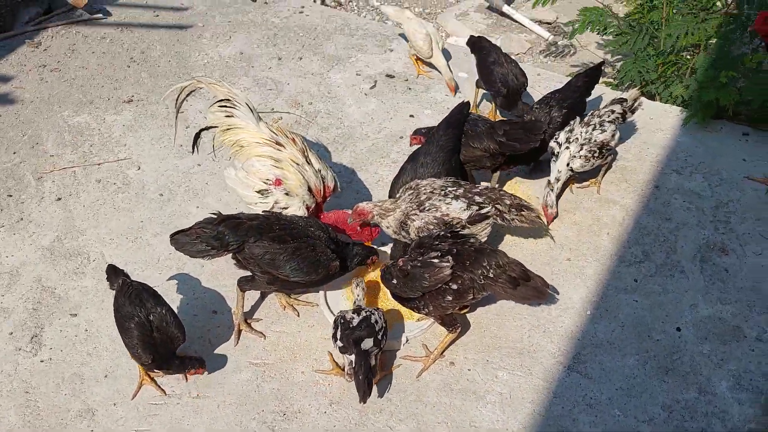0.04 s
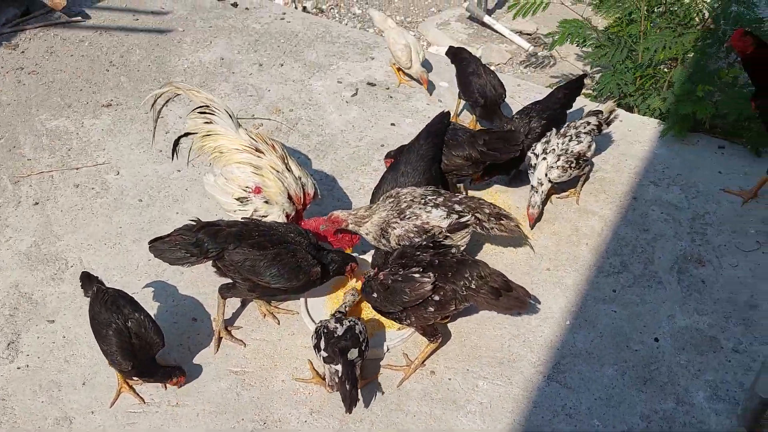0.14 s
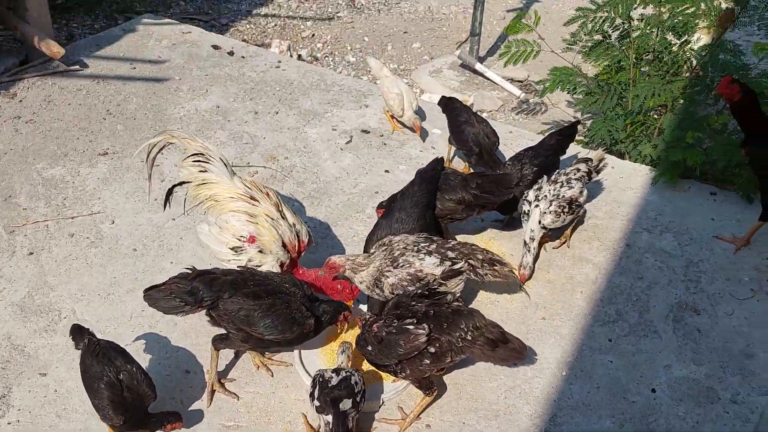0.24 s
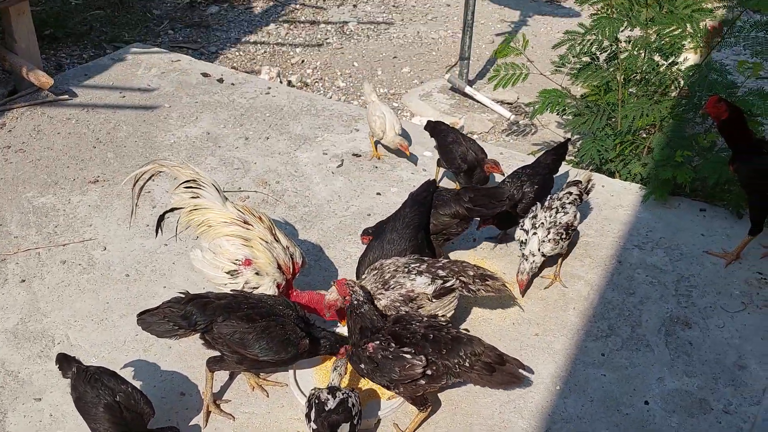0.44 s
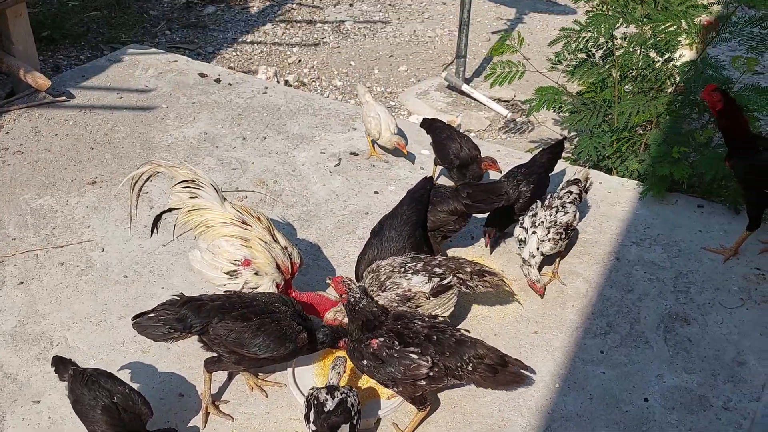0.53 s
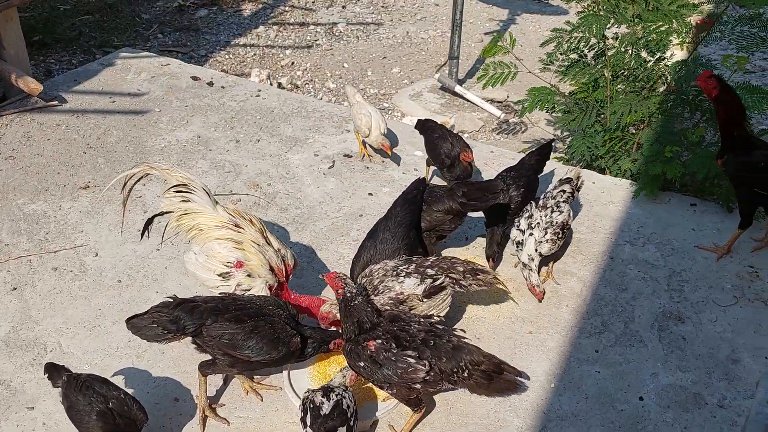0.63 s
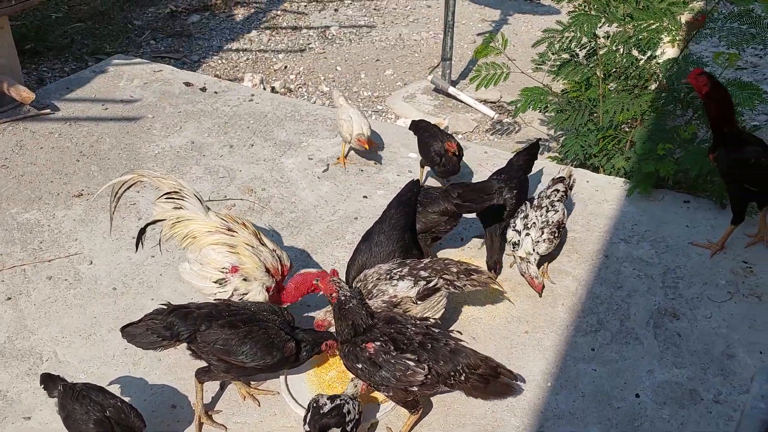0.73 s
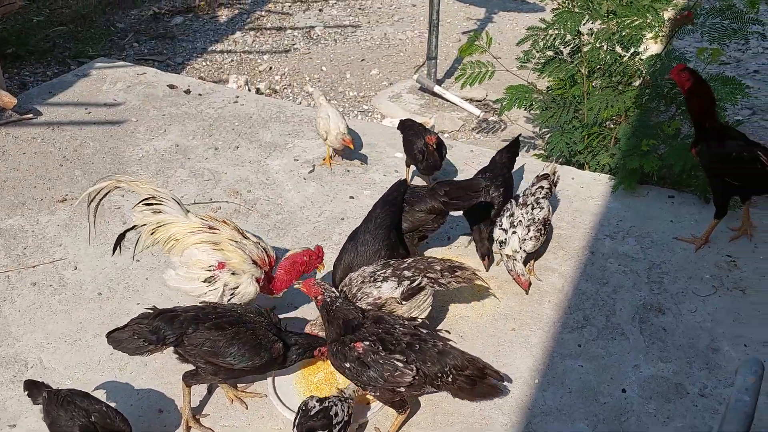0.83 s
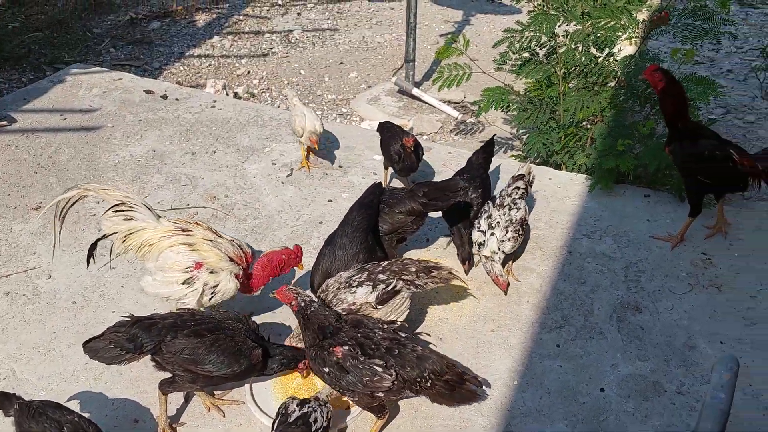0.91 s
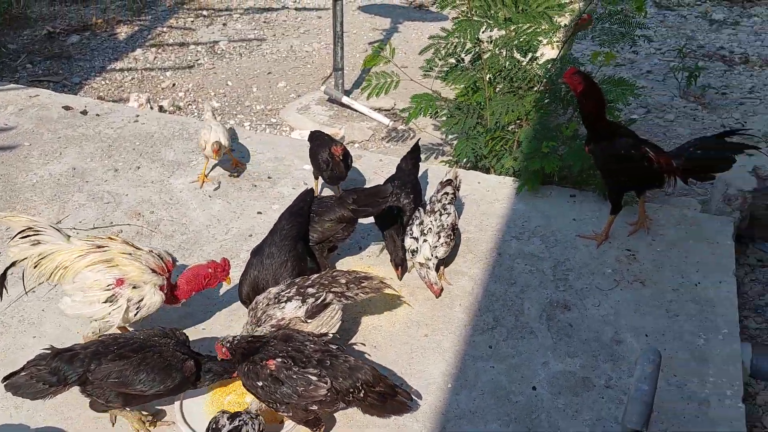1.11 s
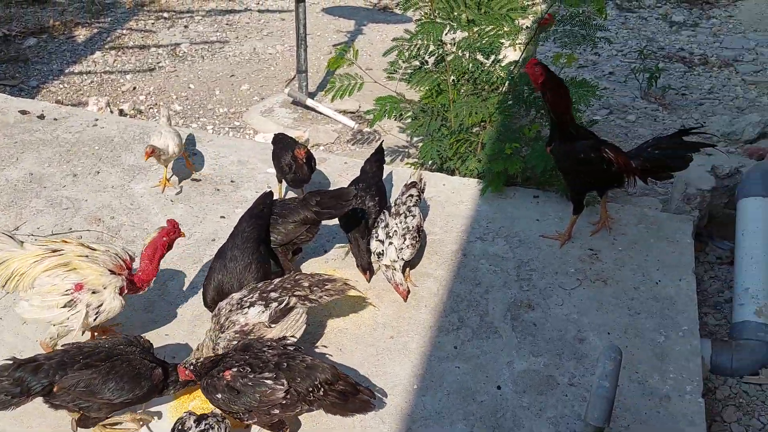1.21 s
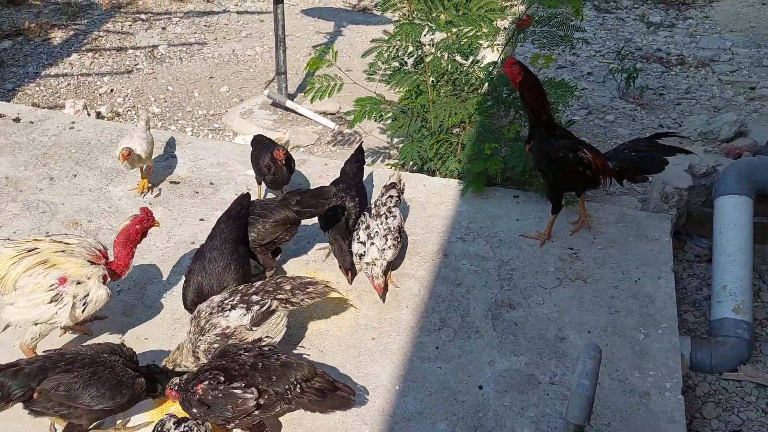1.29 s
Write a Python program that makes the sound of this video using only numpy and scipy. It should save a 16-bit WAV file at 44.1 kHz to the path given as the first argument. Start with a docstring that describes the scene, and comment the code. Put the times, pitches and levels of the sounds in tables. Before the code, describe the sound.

A hen's loud call over pecking at a grain plate on concrete. Knocks at 0 and 0.04 s, a soft cluck from another hen near 0.1, a hoarse syllable 0.2-0.43, a loud clear one 0.53-0.65, a fluttering broken one 0.7-0.86, sliding to a quieter held lower note until 1.07, then a low cluck to 1.17. Irregular dry knocks continue to 1.33; faint hiss, short wall echo.

```python
"""A beak knocks a plate on concrete in a walled yard, another hen clucks softly, then one hen calls:
a hoarse syllable, a clear one, a broken one sliding to a held lower note, a last cluck. Knocks are
filtered clicks over decaying plate modes, clear notes are stacks of sines, and the hoarse voice is
irregular pulses and breath through throat resonances. A grain ticks as a short ring; hiss and low
wind are shaped noise. The walls answer as decaying noise convolved with voice and knocks."""
import sys
import numpy as np
from scipy import signal
from scipy.fft import rfft, irfft, next_fast_len
from scipy.io import wavfile
from scipy.ndimage import uniform_filter1d, map_coordinates

SR = 44100
rng = np.random.default_rng(int(sys.argv[2]) if len(sys.argv) > 2 else 0)


def materialize(psi):
    """Save the field psi as 16-bit PCM at rate SR to the path in sys.argv[1].

    A 1-D psi becomes a single channel; in a 2-D psi each row is a channel.
    """
    bounded = np.clip(np.atleast_2d(psi).T, -1, 1)
    quanta = np.round(bounded * 32767).astype(np.int16)
    wavfile.write(sys.argv[1], SR, quanta)


def magnitude_from_level(level_db):
    """Linear magnitude for a level in decibels (20 dB per decade)."""
    exponent = np.asarray(level_db, float) / 20
    return 10 ** exponent


N = 59535  # samples in the scene


def unit(x):
    """Normalisation: scales x to rms 1."""
    return x / np.sqrt(np.mean(x ** 2) + 1e-20)


def along(points, hz):
    """Logarithmic frequency: interpolates (frequency [Hz], value) points on a log axis."""
    f, v = np.transpose(points)
    return np.interp(np.log(hz + 1), np.log(f + 1), v)


def curves(rows):
    """Envelopes: one value per sample for each column after the time, and a gate for the span."""
    s, *cols = np.transpose(rows)
    t = np.arange(N) / SR
    gate = np.clip(np.minimum(t - s[0], s[-1] - t) / 0.0052, 0, 1)
    return [np.interp(t, s, c) for c in cols] + [gate]


def wobble(rate):
    """Slow random modulation: a smooth curve through random knots, rate of them a second."""
    knots = rng.standard_normal(int(N * rate / SR) + 4)
    return map_coordinates(knots, [np.arange(N) * rate / SR])


def filtered(x, response):
    """Linear filtering: the spectrum of x times a complex response of frequency."""
    m = next_fast_len(N + 8192)
    return irfft(rfft(x, m) * response(np.fft.rfftfreq(m, 1 / SR)), m)[..., :N]


def causal(gain):
    """Minimum phase: folds the cepstrum so that the same gain acts only after its cause."""
    c = irfft(np.log(np.maximum(gain, 1e-6)))
    half = len(c) // 2
    return np.exp(rfft(np.concatenate([c[:1], 2 * c[1:half], np.zeros(half)])))


# decay of the yard's reverberation: (frequency [Hz], t60 [s])
YARD_DECAY = [(200, 0.27), (1000, 0.16), (4000, 0.13), (14000, 0.062)]


def yard_tail():
    """Reverberation: stereo noise of unit energy in which each frequency dies at its own speed."""
    wall_delay_s = 0.008
    hz, t, z = signal.stft(rng.standard_normal((2, SR // 3)), SR, nperseg=256)
    decay = magnitude_from_level(-60 * t / along(YARD_DECAY, hz)[:, None])
    tail = signal.istft(z * decay, SR, nperseg=256)[1]
    return np.pad(tail / np.linalg.norm(tail[0]), ((0, 0), (round(wall_delay_s * SR), 0)))


# spectrum of the yard hiss: (frequency [Hz], relative density [dB per Hz])
HISS_SPECTRUM = [(35, -27.5), (60, -10), (803, -4.5), (1110, 2), (3120, -8.5), (3340, -7.5), (3850, -1),
                 (5720, -13.5), (7750, -15), (16000, -15.5)]
# level of the hiss: (time [s], level [dB])
HISS_LEVEL = [(0, -50.5), (.1, -48.5), (.17, -60.5), (.3, -55), (.49, -57), (.69, -55), (1.0, -43),
              (1.2, -56), (1.27, -59.5), (1.35, -43.5)]
# spectrum of low wind on the ports: (frequency [Hz], relative level [dB])
WIND_SPECTRUM = [(20, -13), (50, 3.5), (90, -3), (160, -8), (300, -48)]
# level of the wind: (time [s], level before panning [dB])
WIND_LEVEL = [(0, -59), (.06, -57), (.15, -74), (.8, -82), (1.05, -79), (1.35, -76)]


def air():
    """Shaped noise: independent hiss at each port, and low wind partly shared by both."""
    wind_pan_db = -4.5  # added on the left, taken off on the right
    hiss = unit(filtered(rng.standard_normal((2, N)), lambda f: magnitude_from_level(along(HISS_SPECTRUM, f))))
    shared, own = rng.standard_normal(N), rng.standard_normal((2, N))
    wind = unit(filtered(shared + 1.8 * own, lambda f: magnitude_from_level(along(WIND_SPECTRUM, f))))
    hiss_gain = magnitude_from_level(curves(HISS_LEVEL)[0] + 1.5 * wobble(12))
    wind_gain = magnitude_from_level(curves(WIND_LEVEL)[0] + 2.1 * wobble(5.44))
    return hiss_gain * hiss + wind_gain * wind * magnitude_from_level([[wind_pan_db], [-wind_pan_db]])


# single grains ticking on concrete: (time [s], level before panning [dB], ring frequency [Hz])
GRAIN_TICKS = [(0.4866, -39.5, 5000)]


def ticks():
    """Damped oscillation: a short high ring with a noisy crack, both decaying exponentially."""
    t60_s, crack_share = 0.011, 0.49
    pan_db = -7.5  # added on the left, taken off on the right
    out, t = np.zeros(N + SR), np.arange(2048) / SR
    for s, db, hz in GRAIN_TICKS:
        crack = np.diff(uniform_filter1d(rng.standard_normal(len(t) + 1), size=2))
        ring = np.sin(2 * np.pi * hz * t) + crack_share * crack
        out[round(s * SR):][:len(t)] += magnitude_from_level(db - 60 * t / t60_s) * ring
    return out[:N] * magnitude_from_level([[pan_db], [-pan_db]])


# pecks: (time [s], knock level before trim [dB], thump level before trim [dB],
# brightness [dB per octave], left over right [dB], rattle length [s])
PECKS = [(0.0, -29, -44.5, -1, -5, 0.025), (0.04, -17.5, -43.5, 1.5, -2.5, 0.03),
         (0.188, -23, -46, 2.5, -0.5, 0.028), (0.253, -21, -44.5, -5, -1, 0.027),
         (0.511, -27, -51, 2.5, 11, 0.024), (0.524, -21.5, -47.5, 0, -9, 0.033),
         (0.636, -25.5, -42, -1, -1.5, 0.028), (0.744, -31.5, -67, 6.5, 0.0, 0.028),
         (0.84, -24.5, -53.5, 3, -3, 0.03), (0.993, -25, -40.5, 6, -2, 0.032),
         (1.049, -23, -49, 2, -1, 0.03), (1.133, -27.5, -47.5, 4.5, 0, 0.026),
         (1.222, -34, -74, 10, -1, 0.033), (1.278, -47, -77, 7, 0.0, 0.026),
         (1.289, -44.5, -65.5, 9, -2, 0.025), (1.329, -24.5, -45, 0.5, -4, 0.026)]
# spectrum of beak and grain: (frequency [Hz], relative density [dB per Hz])
KNOCK_SPECTRUM = [(240, -57.5), (400, -3.5), (765, 2), (1930, -1.5), (2840, -16), (3160, -10.5),
                  (3640, -13), (5690, -22), (8500, -36.5), (12300, -34), (16000, -50)]
# low modes of the plate: (frequency [Hz], relative level [dB], t60 [s])
PLATE_MODES = [(242, 11, 0.028), (309.5, 2.5, 0.049), (181, -26, 0.13)]


def pecks():
    """Impact excitation: a click and thinning rattle of grain, damped plate modes, and an echo."""
    grains, first_click_db, thinning = 320, 6.5, 1.1
    knock_trim_db, thump_trim_db, echo_db = -2, 3.5, -5
    low_cut_hz, thump_rise_s = 293, 0.0036
    out, t = np.zeros((2, N + SR)), np.arange(4096) / SR
    hz = np.fft.rfftfreq(len(t), 1 / SR)
    low_cut = hz ** 2 / (hz ** 2 + low_cut_hz ** 2)
    for s, db, thump_db, tilt_db, pan_db, length in PECKS:
        when, size = rng.random(grains), rng.standard_normal(grains)
        at = (when * length * SR).astype(int)
        clicks = np.bincount(at, size * (1 - when) ** thinning, len(t))
        clicks[0] = magnitude_from_level(first_click_db)
        colour_db = along(KNOCK_SPECTRUM, hz) + tilt_db * np.log2(hz / 2000 + 0.22)
        knock = irfft(rfft(clicks) * causal(magnitude_from_level(colour_db) * low_cut))
        knock = 9 * knock / np.linalg.norm(knock)
        modes = sum(magnitude_from_level(level - 60 * t / t60) * np.sin(2 * np.pi * f * t) for f, level, t60 in PLATE_MODES)
        thump = modes * (1 - np.exp(-t / thump_rise_s))
        hit = magnitude_from_level(db + knock_trim_db) * knock + magnitude_from_level(thump_db + thump_trim_db) * thump
        both = magnitude_from_level(echo_db) * signal.fftconvolve(hit[None], yard_tail(), axes=1)
        both[:, :len(t)] += hit * magnitude_from_level([[pan_db / 2], [-pan_db / 2]])
        out[:, round(s * SR):][:, :both.shape[1]] += both
    return out[:, :N]


# multiples of the pitch whose levels fill a note's columns, in order: {note: (multiple, ..)}
PARTIALS = {"high": (1, 2, 5, 4), "broken": (1, 2, 4), "held": (1, 2, 3, 6, 4), "cluck": (1, 2, 4),
            "far": (1, 2)}


def note(name, rows, overtones):
    """Additive synthesis: a clear note as a stack of partials; returns it with its phase."""
    waver = 0.00338  # pitch unsteadiness, share
    hz, *level_db, gate = curves(rows)
    phase = 2 * np.pi * np.cumsum(hz * (1 + waver * wobble(120))) / SR
    levels = list(zip(PARTIALS[name], level_db))
    # overtones follow the last listed partial
    levels += [(k, level_db[-1] + db + 0.88 * wobble(62.5)) for k, db in overtones]
    return gate * np.sqrt(2) * sum(magnitude_from_level(db) * np.sin(k * phase + k * k) for k, db in levels), phase


def buzz(rows, phase):
    """Harmonic series: upper partials of like but unsteady level, with the span they fill."""
    smear = 0.06  # phase jitter [rad per multiple]
    gate = uniform_filter1d(curves(rows)[-1], 400)
    partials = sum(magnitude_from_level(5.4 * wobble(70.67)) * np.sin(k * phase + k * k + smear * k * wobble(300))
                   for k in range(5, 19))
    return gate * partials / 4.6, gate


# stretches where the voice flutters as a note gives way: (start [s], length [s], depth [0-1])
FLUTTERS = [(.605, .042, .9), (.807, .056, .9)]


def flutter():
    """Amplitude modulation: a gain that beats quickly inside each fluttering stretch."""
    beat_hz = 71
    t, gain = np.arange(N) / SR, np.ones(N)
    for s, length, depth in FLUTTERS:
        inside = (t > s) & (t < s + length)
        gain = gain * (1 - inside * depth * np.sin(np.pi * beat_hz * (t - s)) ** 2)
    return gain


# another hen's soft cluck: (time [s], pitch [Hz], then level of each partial [dB])
NOTE_FAR = [(0.07, 596, -75, -58), (0.08, 600, -52, -39), (0.09, 532, -38.5, -45), (0.102, 522, -49, -42),
            (0.125, 550, -65, -63)]


def far_cluck():
    """Additive synthesis: another hen's soft cluck of two partials."""
    return note("far", NOTE_FAR, [])[0]


# clear syllable: (time [s], pitch [Hz], then level of each partial before flutter [dB])
NOTE_HIGH = [(0.528, 830.5, -68, -20, -47, -65), (0.544, 805, -16, -40, -41, -37),
             (0.564, 773.5, -9.5, -20, -53.5, -29), (0.582, 789, -12.5, -15.5, -32.5, -27),
             (0.6, 757.5, -17.5, -71, -77.5, -82), (0.606, 753.5, -13.5, -35, -68, -62),
             (0.61, 807, -19.5, -38, -58, -50), (0.634, 770, -23.5, -43, -67.5, -68),
             (0.646, 733, -40, -56, -73, -72), (0.678, 773, -36.5, -71, -82, -75),
             (0.69, 754, -38, -50, -99, -81)]
# its overtones: (multiple of the pitch, level over the last partial [dB])
OVER_HIGH = [(3, -13), (10, -15.5)]


def clear_syllable():
    """Harmonic voice: the clear syllable, and its buzz."""
    tone, phase = note("high", NOTE_HIGH, OVER_HIGH)
    return tone, buzz(NOTE_HIGH, phase)


# broken syllable: (time [s], pitch [Hz], then level of each partial before flutter [dB])
NOTE_BROKEN = [(0.68, 796.0, -34, -79, -71), (0.692, 800, -60, -28.5, -54), (0.716, 740.6, -26, -30, -45),
               (0.754, 706.6, -35, -59, -49), (0.762, 728.6, -20, -50, -42), (0.766, 745, -19.5, -39, -35),
               (0.776, 749.6, -12.5, -34, -32), (0.796, 722.4, -40, -35.5, -34),
               (0.802, 718, -26, -29, -42), (0.81, 698.4, -10.5, -38, -20), (0.818, 729, -15.5, -22, -56),
               (0.834, 742, -19, -59, -59), (0.84, 694, -19.5, -48, -53), (0.852, 774, -26, -64, -59),
               (0.875, 795, -62, -53, -54)]
# its overtones: (multiple of the pitch, level over the last partial [dB])
OVER_BROKEN = [(3, -0.5)]


def broken_syllable():
    """Frequency modulation: the broken syllable of jumping pitch, and its buzz."""
    tone, phase = note("broken", NOTE_BROKEN, OVER_BROKEN)
    return tone, buzz(NOTE_BROKEN, phase)


# held lower note: (time [s], pitch [Hz], then level of each partial [dB])
NOTE_HELD = [(0.85, 519.7, -42.5, -44, -52, -50, -60), (0.894, 526.2, -38, -38.5, -36.5, -74, -47),
             (0.936, 526, -39, -40, -39, -71, -70), (0.964, 514, -34.5, -44, -42, -46, -55),
             (0.978, 515, -35, -45, -38, -66, -45), (0.99, 513.7, -40, -33, -38, -46, -65),
             (1.008, 496, -32.5, -34.5, -30, -21.5, -30.5), (1.038, 493.5, -33, -33.5, -42, -43, -29.5),
             (1.05, 484, -35, -41, -40, -57, -45), (1.058, 488, -34, -49, -43, -60, -56),
             (1.08, 463, -40, -74, -62, -59, -76)]
# its overtones: (multiple of the pitch, level over the last partial [dB])
OVER_HELD = [(1.7, -14)]
# partials midway between its harmonics: (multiple of the pitch, typical peak level [dB])
HALVES = [(2.5, -36.5), (3.5, -50), (5.5, -45)]


def held_note():
    """Subharmonics: the held note with a brief swell of half-way partials, and its buzz."""
    centre_s, half_width_s = 0.918, 0.034
    tone, phase = note("held", NOTE_HELD, OVER_HELD)
    swell = np.clip(1 - ((np.arange(N) / SR - centre_s) / half_width_s) ** 2, 0, 1)
    halves = swell * sum(magnitude_from_level(db + 5.8 * wobble(80.7)) * np.sin(k * phase) for k, db in HALVES)
    return tone + halves, buzz(NOTE_HELD, phase)


# last cluck: (time [s], pitch [Hz], then level of each partial [dB])
NOTE_CLUCK = [(1.05, 364.5, -84, -57, -31), (1.066, 367, -34, -31, -54), (1.072, 362, -60, -35.5, -50.5),
              (1.092, 359, -34, -28, -57), (1.106, 330.5, -33, -41, -44), (1.124, 323.6, -35, -26.5, -75),
              (1.132, 316.6, -39, -30, -90), (1.144, 312.5, -46, -62, -56), (1.17, 340, -66, -42, -92)]
# its overtones: (multiple of the pitch, level over the last partial [dB])
OVER_CLUCK = [(3, 8), (5, -4), (6, -18), (8, 10.5)]


def last_cluck():
    """Additive synthesis: the low cluck that ends the call."""
    return note("cluck", NOTE_CLUCK, OVER_CLUCK)[0]


# spectrum of the hoarse treble: (frequency [Hz], relative density [dB per Hz])
TREBLE = [(2060, -13), (3500, -3), (3780, 5.5), (4490, -10.5), (5600, 2.5), (6610, -9.5), (8100, -1.5),
          (8860, -3.5), (9560, -2.5), (13300, -15.5), (16000, -36.5)]


def treble(pulses, buzzes):
    """Modulated turbulence: hiss that swells with each pulse, mixed with the clear notes' buzz."""
    voiced = 0.6  # share that rings at the pitch of a clear note
    hiss = unit(rng.standard_normal(N) * (1.3 + unit(uniform_filter1d(pulses, 30))))
    span = np.clip(sum(gate for _, gate in buzzes), 0, 1)
    mix = hiss * (1 - voiced * span) + voiced * sum(wave for wave, _ in buzzes)
    return unit(filtered(mix, lambda f: magnitude_from_level(along(TREBLE, f))))


def resonances(f, rings):
    """Resonance: a flat response plus band-pass peaks."""
    return 1 + sum(magnitude_from_level(db) * 1j * f * w / (c * c - f * f + 1j * f * w) for c, w, db in rings)


# hoarse voice: (time [s], throat level before gain [dB], treble level [dB], beak opening [0-1])
HOARSE = [(0.197, -29.5, -50.5, 0.27), (0.235, -25.5, -42.5, 0.11), (0.335, -26, -42.5, 0.07),
          (0.419, -41.5, -62, 0.02), (0.445, -79, -90, 0.3), (0.477, -57.5, -63, 0.4), (0.487, -63, -66, 0),
          (0.503, -87, -85, 0.3), (0.509, -66, -83, 1), (0.531, -32, -44, 0.43), (0.569, -34, -33.5, 0.67),
          (0.649, -51.5, -60, 1), (0.691, -54, -70, 0.55), (0.737, -25.5, -41, 1), (0.749, -29, -41, 0.98),
          (0.791, -43, -39, 0.7), (0.821, -36.5, -46, 1), (0.879, -49.5, -55.5, 1),
          (0.923, -46, -50.5, 0.85), (0.969, -64, -72, 0.4), (1.009, -46.5, -48.5, 0.2),
          (1.037, -46, -52.5, 0.6), (1.053, -43.5, -62, 0.5), (1.113, -59, -65, 0.6), (1.141, -55, -79, 1),
          (1.19, -91, -81.5, 0.43)]
# throat with the beak nearly shut: (frequency [Hz], relative density [dB per Hz])
THROAT_SHUT = [(88, -67), (150, -50), (233, -21.5), (362, -26.5), (510, -13.5), (640, -2.5), (782, 0.5),
               (851, -3.5), (927, -5), (1040, -18), (1420, -8), (1550, -3), (1890, -24.5), (2580, -7.5),
               (3110, -24.5), (3740, -18.5), (4500, -32.5), (5850, -62.5), (9900, -120)]
# throat with the beak open: (frequency [Hz], relative density [dB per Hz])
THROAT_OPEN = [(88, -85.5), (150, -57.5), (297, -42.5), (482, -18), (572, -14), (640, 3.5), (941, -6.5),
               (1070, -11), (1250, -9.5), (1840, -8.5), (2480, -41), (2940, -6), (3290, -63), (3850, -24),
               (4500, -27), (5850, -78), (9900, -120)]
# narrow throat resonances: (frequency [Hz], width [Hz], level [dB])
RINGS = [(648, 35, 6), (712, 35, 5), (778, 30, 8), (900, 30, 6), (1500, 35, 5), (1582, 24, 10),
         (2525, 30, 5), (2780, 150, 4)]
# resonances added when the beak is open: (frequency [Hz], width [Hz], level [dB])
OPEN_RINGS = [(1296, 100, 6), (1830, 400, 4), (2130, 180, 16)]


def hoarse(buzzes):
    """Source-filter principle: irregular pulses and breath through the throat, plus treble."""
    pulse_hz, scatter = 729.6, 0.45  # mean rate; timing spread in pulse periods
    size_db, breath, gain_db = 8, 0.54, 8.5  # pulse size limit; breath over pulses; throat gain
    throat_db, treble_db, opening, gate = curves(HOARSE)
    draws = rng.standard_normal((int(N / SR * pulse_hz), 2))
    at = (np.arange(len(draws)) + scatter * draws[:, 0]) / pulse_hz * SR
    pulses = np.bincount(np.clip(at, 0, N - 1).astype(int), magnitude_from_level(size_db * np.tanh(draws[:, 1])), N)
    source = unit(pulses - pulses.mean()) + breath * rng.standard_normal(N)
    voice = gate * magnitude_from_level(treble_db) * treble(pulses, buzzes)
    for colour, rings, share in [(THROAT_SHUT, RINGS, 1 - opening),
                                 (THROAT_OPEN, RINGS + OPEN_RINGS, opening)]:
        throat = lambda f: causal(magnitude_from_level(along(colour, f))) * resonances(f, rings)
        driven = source * share * gate * magnitude_from_level(throat_db + gain_db)
        voice = voice + filtered(driven, throat) / np.std(filtered(source, throat))
    return voice


# level of the voice off the walls: (frequency [Hz], level [dB])
WALL_COLOUR = [(300, -14.5), (800, -11), (1600, -1), (4000, -1), (12000, 5.5)]


def call():
    """Direct and reflected sound: all the voices, delayed between the ports, and off the walls."""
    lag_s = 0.00017  # the call reaches the right port first
    clear_wall_db = -12  # clear notes sent to the walls, kept low so their partials stay steady
    high, high_buzz = clear_syllable()
    broken, broken_buzz = broken_syllable()
    held, held_buzz = held_note()
    clear = held + (high + broken) * flutter() + last_cluck() + far_cluck()
    rough = hoarse([high_buzz, broken_buzz, held_buzz])
    side = np.array([[-.5], [.5]])
    direct = filtered(clear + rough, lambda f: np.exp(2j * np.pi * f * lag_s * side))
    sent = magnitude_from_level(clear_wall_db) * clear + rough
    echo = signal.fftconvolve(sent[None], yard_tail(), axes=1)[:, :N]
    return direct + filtered(echo, lambda f: magnitude_from_level(along(WALL_COLOUR, f)))


def scene():
    """Superposition: air, ticks, pecks and call add."""
    return air() + ticks() + pecks() + call()


# difference in colour of the two ports: (frequency [Hz], left over right [dB])
PORTS = [(60, 0), (180, -5), (550, -1), (1650, -1), (4970, -3), (15000, -6.5)]


def top_cut(x):
    """Nothing passes above the cut-off."""
    return signal.sosfilt(signal.butter(12, 16450, fs=SR, output="sos"), x)


def record(dry):
    """Frequency response: the two microphone ports differ in colour."""
    ports = filtered(dry, lambda f: magnitude_from_level(along(PORTS, f) * np.array([[.5], [-.5]])))
    return top_cut(ports)


dry = scene()
out = record(dry)
materialize(out)
```